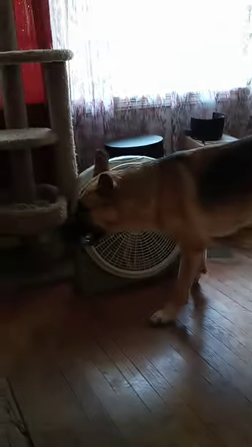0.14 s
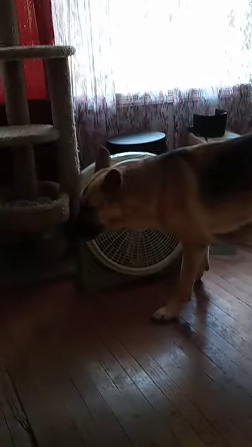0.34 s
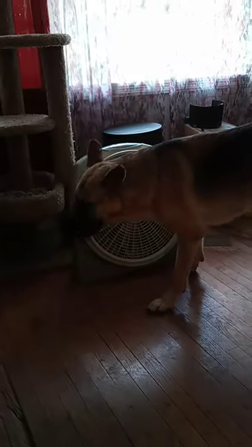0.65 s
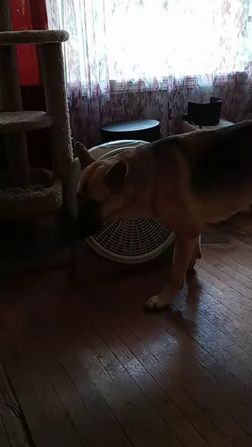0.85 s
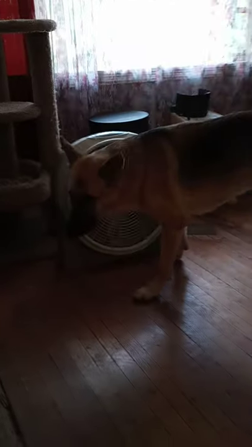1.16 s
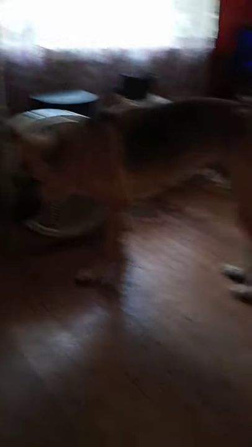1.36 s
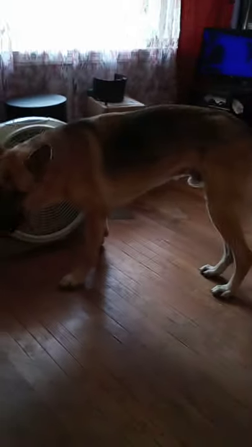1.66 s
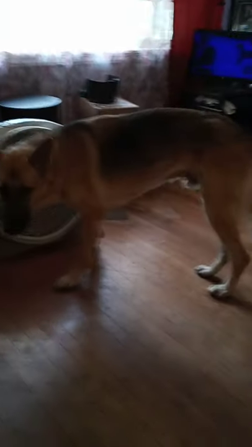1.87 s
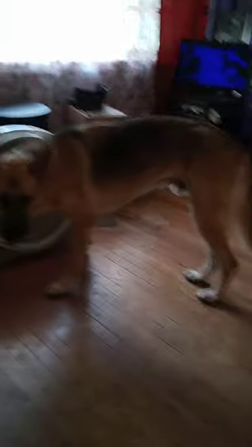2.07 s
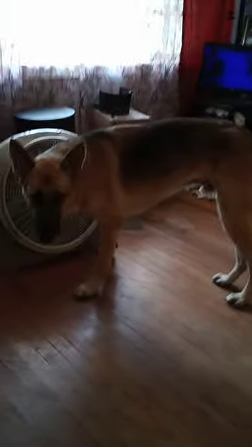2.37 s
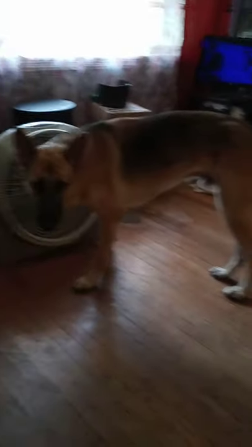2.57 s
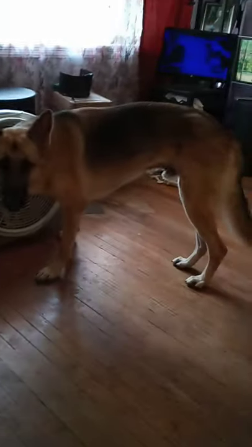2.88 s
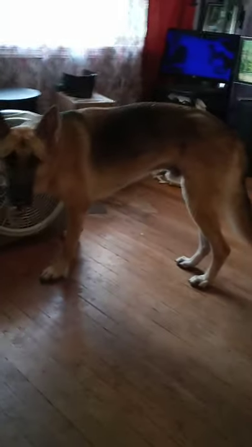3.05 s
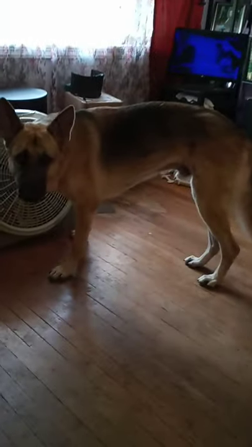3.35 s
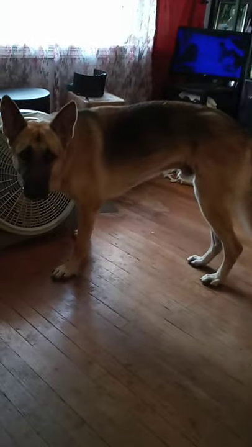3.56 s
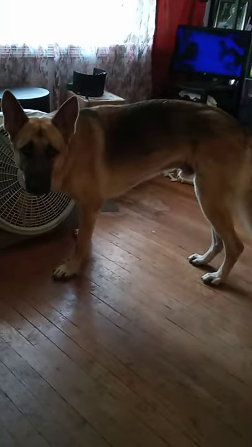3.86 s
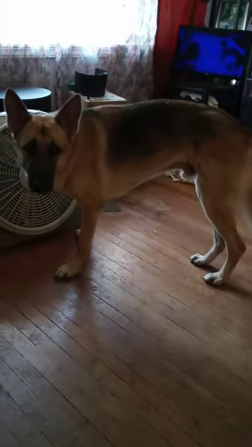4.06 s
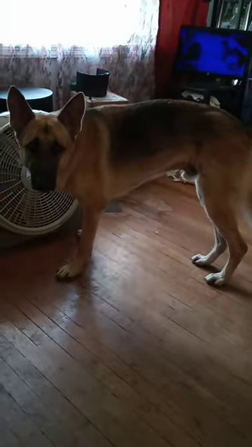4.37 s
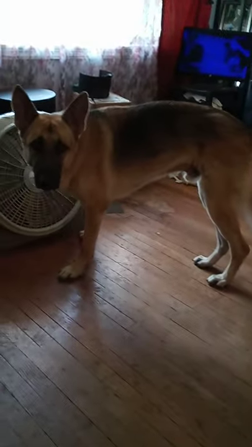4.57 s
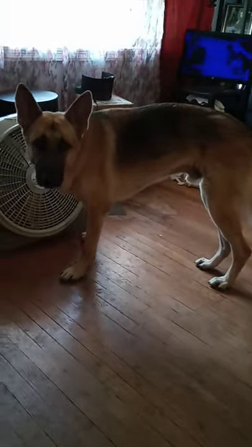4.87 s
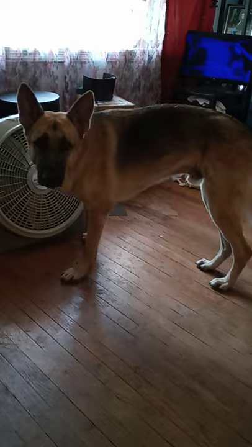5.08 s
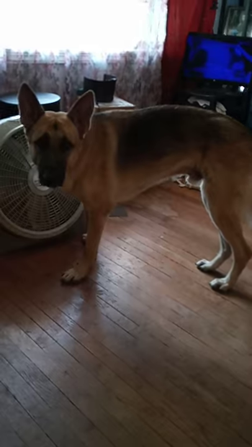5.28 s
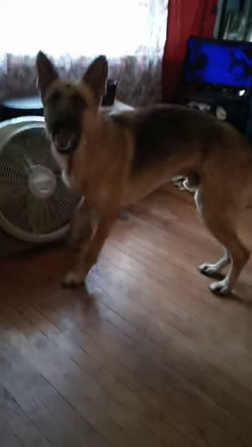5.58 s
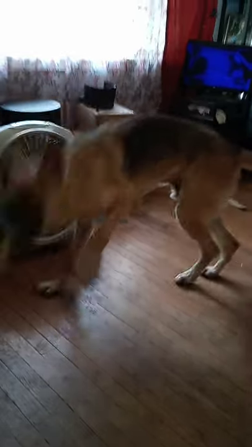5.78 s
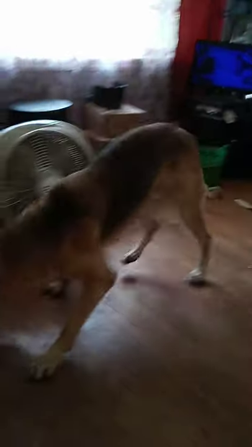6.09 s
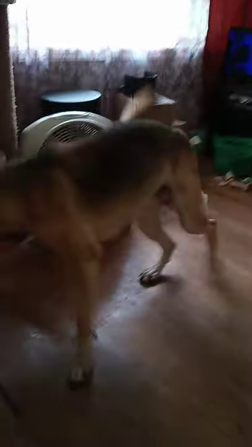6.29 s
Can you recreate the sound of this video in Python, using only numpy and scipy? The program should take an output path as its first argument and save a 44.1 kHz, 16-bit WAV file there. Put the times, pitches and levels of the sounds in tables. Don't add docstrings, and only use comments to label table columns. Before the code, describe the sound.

A phone picks up a large dog moving over hardwood in a small furnished living room with a short, lively echo. Quiet appliance rumble, faint fur rustle and thin hiss lie underneath. From 0.3 to 0.5 s claws clatter sharply, with another hard click near 0.8 and a lighter group at 1.3. Faint hollow board knocks come around 1.0 and 1.5, with soft scrapes and low groans. Lighter ticks occur at 2.2 to 2.3. From 2.75 a geared toy catches, stutters and whirrs with a plastic buzz, fading by 3.5. Near 3.85 a soft step, claw scrapes and tiny tag chinks. Then near quiet, with a toy blip at 5.4. Faint scrabbling from 5.6 leads to a short whirr and firm step at 5.85, a loud claw crack and heavy double thud at 6.05, another step at 6.28 and a gritty skid at 6.35 with a faint whirr.

```python
import sys
import numpy as np
from scipy import signal
from scipy.fft import rfft, irfft, next_fast_len
from scipy.io import wavfile
from scipy.ndimage import uniform_filter1d, map_coordinates

SR = 44100
rng = np.random.default_rng(int(sys.argv[2]) if len(sys.argv) > 2 else 0)


def wrap_up_sound(samples):
    columns = np.atleast_2d(samples).T
    tamed = np.clip(columns, -1, 1)
    steps = np.round(tamed * 32767).astype(np.int16)
    wavfile.write(sys.argv[1], SR, steps)


def convert_level_to_amplitude(level_db):
    exponent = np.asarray(level_db, float) / 20
    return 10 ** exponent


N = 283563
T = np.arange(N) / SR
SIZE = next_fast_len(N + SR)
HZ = np.maximum(np.fft.rfftfreq(SIZE, 1 / SR), 1)


def unit(x):
    return x / np.sqrt(np.mean(x ** 2))


def shape(points, rings=(), ring_db=0):
    hz, db = np.transpose(points)
    gain = convert_level_to_amplitude(np.interp(np.log(HZ), np.log(hz), db))
    lift = sum(convert_level_to_amplitude(2 * d) / (1 + (2 * (HZ - f) / w) ** 2) for f, w, d in rings)
    gain = gain * np.sqrt(1 + convert_level_to_amplitude(2 * ring_db) * lift)
    return gain / np.sqrt(np.mean(gain[(HZ > 2000) & (HZ < 5000)] ** 2))


def causal(gain):
    cep = irfft(np.log(gain + 1e-9), SIZE)
    cep[1:SIZE // 2] *= 2
    cep[SIZE // 2 + 1:] = 0
    return np.exp(rfft(cep))


def filt(x, response):
    return irfft(rfft(x, SIZE) * response, SIZE)[:N]


def low(hz):
    return 1 / np.sqrt(1 + (HZ / hz) ** 6)


def walk(rate):
    k = int(SR / rate)
    held = np.repeat(rng.standard_normal(N // k + 1), k)
    return unit(uniform_filter1d(uniform_filter1d(held, k), k)[:N])


def claws():
    # start in seconds, peak in dB, board knock in dB, bright tick in dB
    strikes = [(0.3612, -11.5, -18.5, 2.5), (0.378, -34, -25, -13), (0.4116, -15.5, -21, -11),
               (0.428, -25, -2, 8.5), (0.461, -33, -6, -22), (0.752, -28.5, -30, -3.5),
               (0.801, -15.5, -10.5, 0), (1.287, -23, -7.5, -21), (1.2991, -29, -7, 3),
               (1.754, -36, -10.5, 6.5), (2.304, -29.5, -5.5, 0), (2.583, -52.5, -22, 7),
               (2.689, -35, -18, 6), (2.711, -41, -31.5, 6), (2.7305, -28, -39, 0.5), (2.751, -33, -3, -5),
               (2.7778, -30.5, 8.5, -25), (2.8334, -29, 6.5, 8), (2.8823, -39, -12, -7),
               (3.87, -30, -16, -2.5), (6.0313, -8.5, -3.5, -3), (6.0561, -13.5, -10, -40),
               (6.2876, -26.5, -1.5, 5)]
    # start in seconds, peak in dB, board knock in dB, bright tick in dB
    snaps = [(0.383, -26, -9, -8), (0.393, -15, -13, 7), (0.4414, -25.5, -1, -1), (0.7374, -39, -23, 3),
             (0.7891, -8.5, -12, 0.5), (0.7943, -23.5, -6, 10), (1.2808, -24, -18, 4),
             (1.315, -26, -21, -13), (2.203, -37, -17, 0.5), (2.236, -35, -30, 2), (2.242, -19.5, -40, 6.5),
             (2.2847, -23.5, -10, 6.5), (4.5983, -38, -28, -19), (6.0287, -11.5, -13, 5),
             (6.037, -29, -17, -12)]
    # start in seconds, peak in dB, board knock in dB, bright tick in dB
    skids = [(0.0014, -29, -7, 0.5), (0.322, -31, -14, 1), (0.337, -26, -12, 0.5), (0.7227, -38, -27, -10),
             (0.7607, -40, 2, -17), (1.0298, -53, 8.5, -11), (1.215, -40, -19, 0), (1.232, -36, -12, -2),
             (1.467, -40, 0.5, -6), (1.651, -27.5, -17, -3.5), (1.6888, -31.5, -17, 0.5),
             (1.7892, -42, -14, 2), (2.152, -41, -4, -16), (2.3286, -52, -18, -4), (2.399, -47, -7, -17),
             (3.818, -33, -31, 1), (3.9084, -35.5, -12, -26), (3.949, -37, -17, -4),
             (4.5012, -48.5, -3, -14), (5.6309, -39.5, -10, 4.5), (5.665, -46, 5, 4), (5.693, -47, 6.5, 6),
             (5.726, -45, 2, 3), (5.756, -37, 0, 5), (5.7789, -30, -7, -1), (6.335, -24, -8, -1),
             (6.352, -25.5, -4, 2), (6.3672, -17, -9, -13)]
    # frequency in Hz, level in dB per Hz
    claw_colour = [(350, -15), (600, -28.5), (894, -13), (1240, -11.5), (1660, -6.5), (1930, -6.5),
                   (2210, -0.5), (2440, -2.5), (2800, -2.5), (4050, 1), (4910, -8), (7110, 0.5),
                   (16000, -29)]
    # frequency in Hz, width in Hz, level in dB
    claw_rings = [(1620, 150, -5), (2260, 250, -2), (3000, 350, -2), (4000, 450, 0), (7100, 700, -1)]
    chatter_s, skid_s = 0.0033, 0.0095
    near, far = np.zeros((3, N + SR)), np.zeros((3, N + SR))
    t = T[:SR // 8]
    rows = strikes + snaps + skids
    wet_db = np.repeat([4.5, -3, 0], [len(strikes), len(snaps), len(skids)])
    size = (len(rows), len(t))
    chatter = rng.standard_normal(size) * convert_level_to_amplitude(5 * rng.standard_normal(size))
    for k, ((s, db, knock_db, tick_db), grit) in enumerate(zip(rows, chatter)):
        if k < len(rows) - len(skids):
            hit = 1.15 * (t == 0) + convert_level_to_amplitude(-23) * grit * np.exp(-t / chatter_s)
        else:
            hit = convert_level_to_amplitude(-23) * grit * (t / skid_s * np.exp(1 - t / skid_s)) ** 2
        hit = convert_level_to_amplitude(db + np.array([[knock_db + 11], [0], [tick_db]])) * hit
        span = slice(int(s * SR), int(s * SR) + len(t))
        near[:, span] += hit
        far[:, span] += hit * convert_level_to_amplitude(wet_db[k] + 10)
    colour = shape(claw_colour, claw_rings, ring_db=-1)
    bands = (low(1900), (1 - low(1900)) * low(5000), 1 - low(5000))
    air = np.sqrt(1 + (HZ / 13000) ** 4)
    direct = sum(filt(x[:N], causal(colour * air * g)) for x, g in zip(near, bands))
    roomward = sum(filt(x[:N], causal(colour * g)) for x, g in zip(far, bands))
    return convert_level_to_amplitude(17.5) * direct, convert_level_to_amplitude(11.5) * roomward


def thuds():
    # start in seconds, peak in dB, ring stretch as a factor
    landings = [
        (2.765, -53, 0.83),
        (3.828, -39, 1.3),
        (5.39, -46.5, 5.4),
        (5.839, -53, 1.2),
        (5.858, -25, 0.85),
        (6.057, -10.5, 0.99),
        (6.073, -18.5, 1.5),
        (6.284, -23, 1.4),
        (6.357, -22.5, 0.31),
    ]
    # frequency in Hz, level in dB, T60 in seconds
    boards = [(124, 1, .35), (165, 3, .25), (186, -1, .2), (250, -1, .22), (330, -12, .18), (431, -14, .18)]
    out, t = np.zeros(N + SR), T[:SR // 2]
    chance = rng.standard_normal((len(landings), len(boards), 2))
    floor_band = signal.butter(2, [115, 450], "band", fs=SR, output="sos")
    shudder = unit(signal.sosfilt(floor_band, rng.standard_normal((len(landings), len(t)))))
    for (s, db, stretch), spot, body in zip(landings, chance, shudder):
        longer = max(stretch, .2)
        sound = convert_level_to_amplitude(-3.5) * body * convert_level_to_amplitude(-60 * t / (0.32 * longer)) * np.clip(t / 0.0047, 0, 1)
        for (hz, mode_db, t60), (detune, scatter) in zip(boards, spot):
            ring = np.sin(2 * np.pi * hz * (1 + .01 * detune) * t) * convert_level_to_amplitude(-60 * t / (t60 * longer))
            sound = sound + convert_level_to_amplitude(mode_db - 3 + scatter) * ring
        out[int(s * SR):int(s * SR) + len(t)] += convert_level_to_amplitude(db - 3.5) * sound
    return filt(out[:N], causal(1 - low(100)))


def toy():
    # frequency in Hz, level in dB per Hz
    toy_colour = [(71, -51), (120, 8), (192, -17.5), (260, 1), (326, -6.5), (665, -5), (737, -7.5),
                  (922, -3), (1600, -7.5), (1900, 2.5), (3000, -5), (4100, -5.5), (5010, -9), (6020, -9.5),
                  (7230, -4), (9820, -17.5), (15700, -28.5)]
    # frequency in Hz, width in Hz, lift in dB
    toy_rings = [(1840, 110, -6), (2280, 70, -5), (2610, 30, -4), (2910, 50, -4), (3590, 150, -3),
                 (4110, 80, -2), (4430, 60, -4), (4960, 220, -2), (5700, 190, -6), (6380, 93, -4),
                 (7170, 73, 2), (7430, 80, -3), (8430, 150, 0), (9700, 150, -5), (10500, 120, -4),
                 (11500, 130, 2), (13800, 250, 0), (14700, 120, -2)]
    # multiple of the shaft rate, level in dB
    harmonics = [(1, -15), (2, -7), (3, -5), (4, -7), (5, -5), (6, 0), (7, -11), (8, -11), (9, -7),
                 (10, -8), (11, -7), (12, 0), (13, -1), (14, -5), (15, -8), (16, -6), (17, -8), (18, -7),
                 (19, -5), (20, -6), (21, -8), (22, -5)]
    speed, level, growl_db = drive()
    turns = np.cumsum(speed * (1 + .001 * walk(30))) / SR
    teeth = irfft(np.exp(2j * np.pi * rng.random(281)))
    pattern = unit(map_coordinates(teeth, [turns % 1 * len(teeth)], order=3, mode="grid-wrap"))
    hum = sum(convert_level_to_amplitude(db + 2 * walk(rate=12)) * np.sin(2 * np.pi * (k * turns + p))
              for (k, db), p in zip(harmonics, rng.random(len(harmonics))))
    # the gears mesh evenly only near full speed, in turns per s
    steady = np.clip((speed - 76.7) / 1.4, .05, .95)
    rattle = unit(rng.standard_normal(N) * convert_level_to_amplitude(2.1 * walk(600)))
    repeat = .9 * low(4000)
    colour = shape(toy_colour, toy_rings, ring_db=7.5)
    clatter = filt(np.sqrt(steady) * pattern + np.sqrt(1 - steady) * rattle, np.sqrt(repeat))
    clatter += filt(rattle[::-1], np.sqrt(1 - repeat))
    whine = unit(filt(clatter, colour * (1 - low(1750))))
    growl = np.sqrt(1 - steady) * unit(filt(rattle, colour * low(1440)))
    low_level = level * convert_level_to_amplitude(growl_db + 5.5)
    return level * whine, low_level * np.sqrt(steady) * unit(hum), low_level * growl


def drive():
    # start in seconds, stop in seconds, level in dB at full speed, growl in dB below 1.5 kHz
    runs = [
        (2.767, 3.49, -22, -15),
        (5.369, 5.41, -22.5, -16),
        (5.81, 5.951, -22.5, -14.5),
        (6.353, 6.407, -33, -14),
    ]
    # fastest moment in seconds, top speed in turns per second
    speeds = [(3.143, 79.2), (5.39, 69), (5.8, 76), (6.38, 70)]
    # time in seconds, extra level in dB, slip in dB
    catches = [
        (2.778, 2, -6),
        (2.832, 2, -29),
        (2.882, -3, -13),
        (5.384, 0.5, -2),
        (5.834, 10.5, -4),
    ]
    start_s, stop_s, slip_s, catch_s = 0.0091, 0.02466, 0.02, 0.004
    speed, level, growl_db = np.zeros(N), np.zeros(N), np.zeros(N)
    for (start, stop, db, rel_db), (fastest, top) in zip(runs, speeds):
        on = np.clip((T - start) / start_s, 0, 1) * np.clip((stop - T) / stop_s + 1, 0, 1)
        sag = 82 * (T - fastest) ** 2 * (on > 0)
        speed += (on > 0) * top - sag
        level += on * convert_level_to_amplitude(db - 0.21 * sag)
        growl_db += (on > 0) * rel_db
    catch_db = 0
    for s, db, slip_db in catches:
        away = np.abs(T - s)
        catch_db = catch_db + np.where(T > s, db * np.exp(-away / catch_s), slip_db * np.exp(-away / slip_s))
    return speed, level * convert_level_to_amplitude(catch_db), growl_db


def tag():
    # start in seconds, peak in dB
    jingles = [
        (3.82, -42),
        (3.871, -52),
        (3.911, -56),
        (3.961, -58),
    ]
    # frequency in Hz, level in dB, T60 in seconds
    tag_modes = [(2680, 0, .3), (2715, -6, .25), (4020, -2, .15), (3750, -7, .12)]
    # start in seconds, peak in dB, frequency in Hz, T60 in seconds
    knocks = [
        (1.018, -47, 1520, .08),
        (1.168, -52, 800, .08),
        (1.47, -40, 1014, 0.048),
        (1.491, -44, 1340, 0.052),
        (3.92, -48, 1140, 0.069),
    ]
    notes = [(s, db + d, hz, t60) for s, db in jingles for hz, d, t60 in tag_modes] + knocks
    out = np.zeros(N)
    for s, db, hz, t60 in notes:
        attack = np.clip((T - s) / 0.002, 0, 1)
        out += convert_level_to_amplitude(db - 60 * np.abs(T - s) / t60) * attack * np.sin(2 * np.pi * hz * (T - s))
    return out


def groan():
    # time in seconds, groan in dB
    weight = [(0.1, -73), (0.45, -58), (0.85, -68.5), (1.15, -63.5), (1.32, -51), (1.6, -58), (2.15, -77),
              (2.4, -57.5), (2.6, -71), (3.58, -57), (3.75, -69), (4.25, -75), (4.8, -62), (5.3, -61),
              (5.6, -65), (5.75, -49.5), (6.3, -69)]
    murmur = filt(rng.standard_normal(N), np.exp(-(np.log2(HZ / 408) / 0.45) ** 2))
    return unit(murmur) * convert_level_to_amplitude(np.interp(T, *np.transpose(weight)) + 3.5 * walk(rate=14))


def house():
    # frequency in Hz, level in dB per Hz
    rumble_colour = [(12, -61), (20, -31), (48, -26), (50, -15), (58, -5), (81, 1), (107, -7), (223, -5),
                     (313, -19), (422, -24), (462, -30), (505, -27), (650, -35), (700, -32), (910, -62),
                     (1540, -120)]
    # frequency in Hz, level in dB per Hz
    rustle_colour = [(450, -41), (600, -19), (1200, -18.5), (1700, -6.5), (2200, 4.5), (3500, 3),
                     (4500, -2), (5000, -17.5), (5600, -15), (6300, -5), (8000, -2.5), (11500, -13.5),
                     (15500, -11)]
    # time in seconds, rustle in dB
    restless = [(0.15, -60), (0.62, -63), (0.72, -58), (1.0, -70), (1.22, -57), (1.42, -62), (1.6, -55.5),
                (1.986, -58), (2.46, -59.5), (2.68, -57), (4.186, -60.5), (4.582, -56), (4.968, -57),
                (5.36, -58), (5.736, -57), (5.8, -42), (6.28, -48)]
    rustle_db = np.interp(T, *np.transpose(restless))
    rumble = unit(filt(rng.standard_normal(N), shape(rumble_colour))) * convert_level_to_amplitude(-47.5 + walk(rate=10))
    colour = shape(rustle_colour)
    bands = []
    for hz in 600 * 2 ** np.arange(0, 5, .5):
        band = filt(rng.standard_normal(N), colour * np.exp(-(np.log2(HZ / hz) * 3) ** 2))
        bands.append(band * convert_level_to_amplitude(2.1 * walk(rate=8)))
    soft = unit(sum(bands[:3])) * convert_level_to_amplitude(-74 + 1.37 * (rustle_db + 60))
    rustle = unit(sum(bands[3:7])) * convert_level_to_amplitude(rustle_db + 1)
    hiss = unit(sum(bands[7:])) * convert_level_to_amplitude(-63)
    return rumble + soft + rustle + hiss


def room():
    # frequency in Hz, T60 in seconds
    decay = [(300, 0.63), (1500, 0.5), (5000, 0.51), (12000, 0.47)]
    t = T[:SR * 3 // 4]
    spikes = convert_level_to_amplitude(4 * np.minimum(rng.exponential(size=len(t)), 5) * np.exp(-t / .07))
    noise = rng.standard_normal(len(t)) * spikes * np.clip((t - .001) / .004, 0, 1)
    hz, t60 = np.transpose(decay)
    spectrum, tail = rfft(noise, SIZE), 0
    for k in range(len(hz)):
        share = np.interp(np.log(HZ), np.log(hz), np.arange(len(hz)) == k)
        tail = tail + irfft(spectrum * share, SIZE)[:len(t)] * convert_level_to_amplitude(-60 * t / t60[k])
    return rfft(tail / np.sqrt(np.sum(tail ** 2)), SIZE)


def scene():
    walls = room()
    near, far = claws()
    whine, hum, growl = toy()
    pads, chink = thuds(), tag()
    roomward = far + convert_level_to_amplitude(-3) * whine + convert_level_to_amplitude(-15) * hum + convert_level_to_amplitude(-6.5) * growl
    roomward = roomward + convert_level_to_amplitude(-10) * pads + convert_level_to_amplitude(-6) * chink
    echo = filt(roomward, walls)
    direct = near + convert_level_to_amplitude(-4) * whine + convert_level_to_amplitude(-1.5) * hum + convert_level_to_amplitude(-3.5) * growl + convert_level_to_amplitude(-1.5) * pads + chink
    return (direct + echo + house() + groan())[None]


def roll_off(x):
    return signal.sosfilt(signal.butter(12, 17000, fs=SR, output="sos"), x)


def record(dry):
    edges = (.5 + .5 * (1 - low(52))) / np.sqrt(1 + (HZ / 15850) ** 120)
    heard = filt(np.tanh(1.163 * dry[0]) / 1.452, edges)[None]
    return roll_off(heard)


dry = scene()
out = record(dry)
wrap_up_sound(out)
```